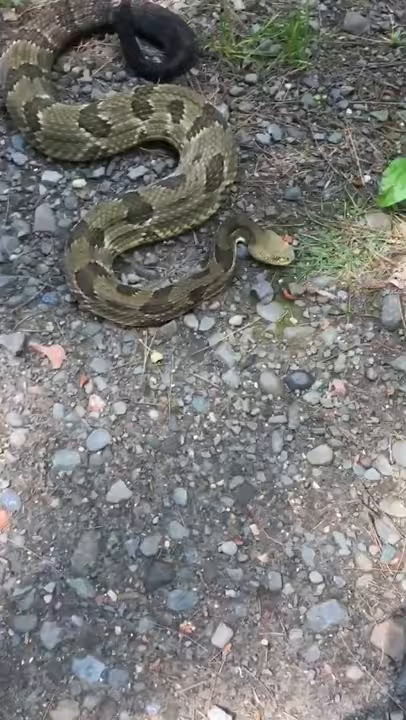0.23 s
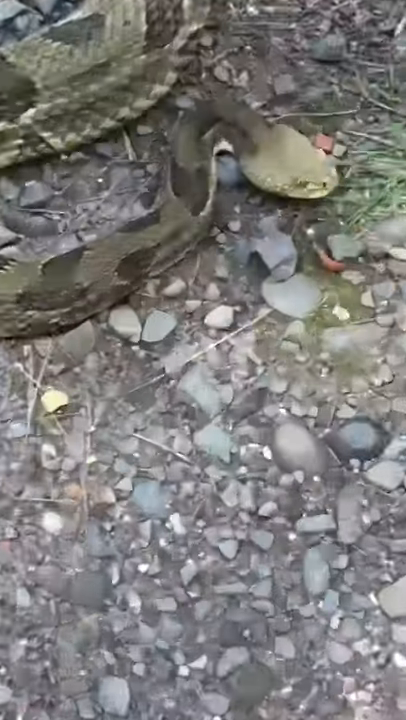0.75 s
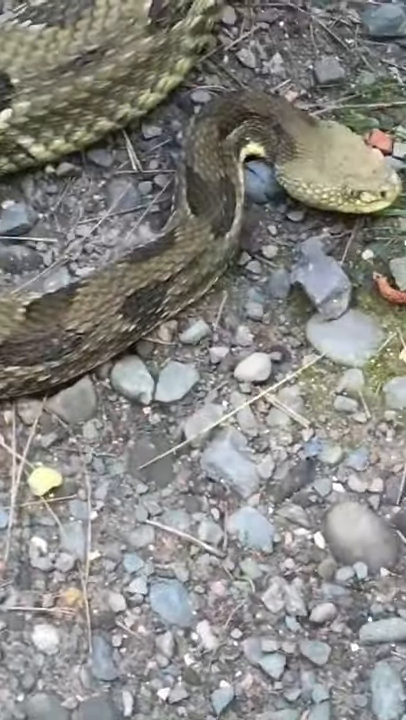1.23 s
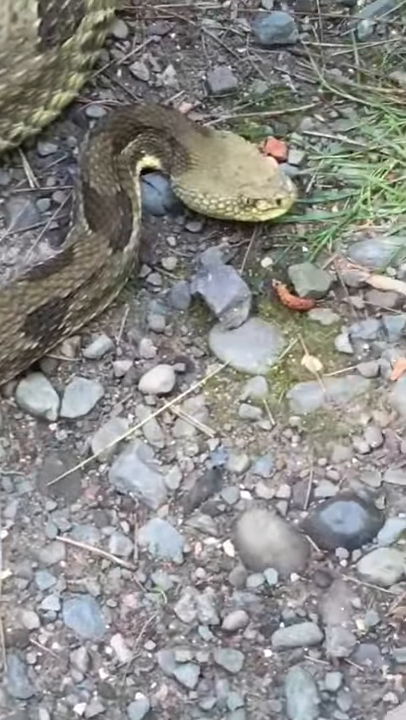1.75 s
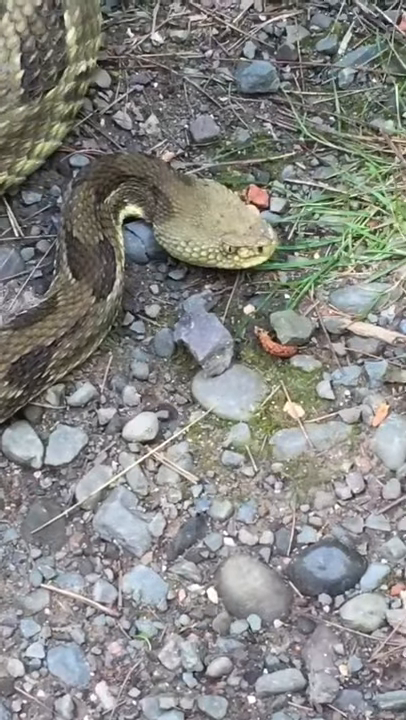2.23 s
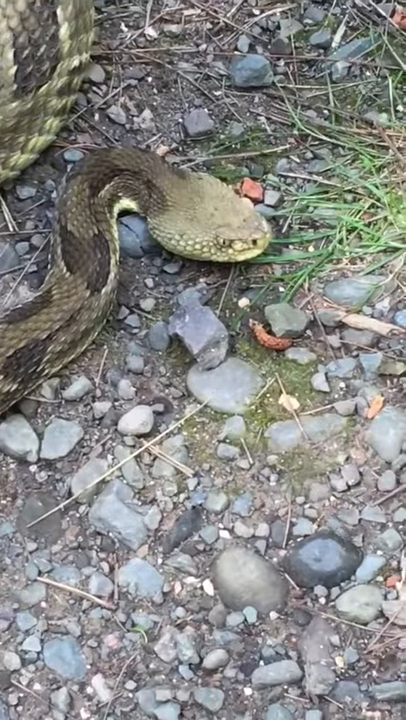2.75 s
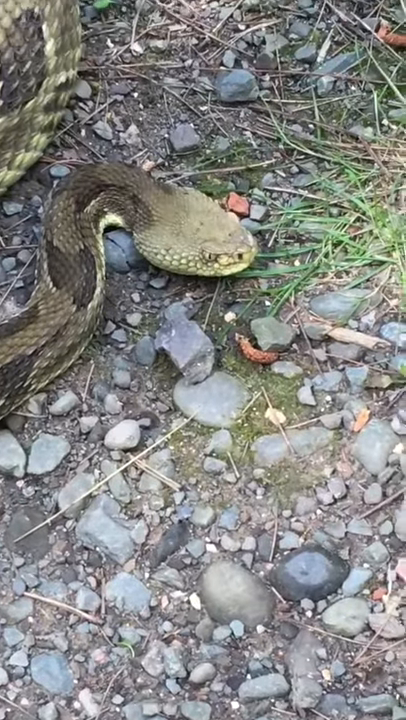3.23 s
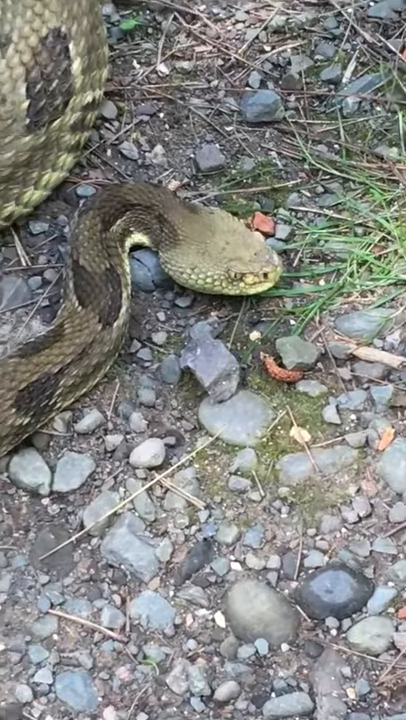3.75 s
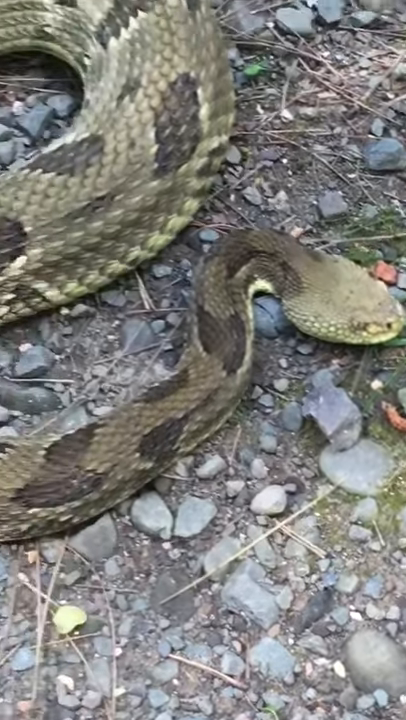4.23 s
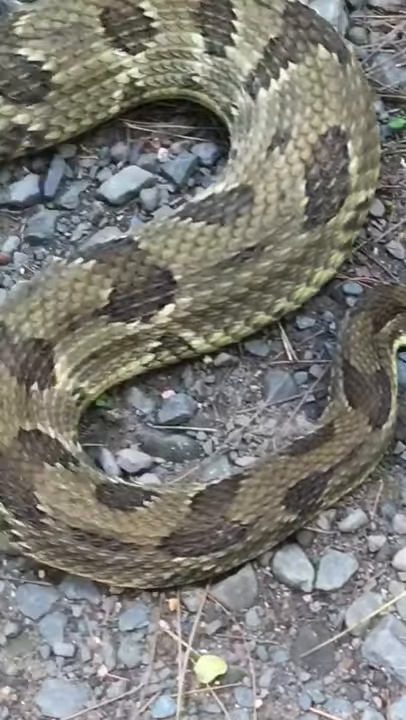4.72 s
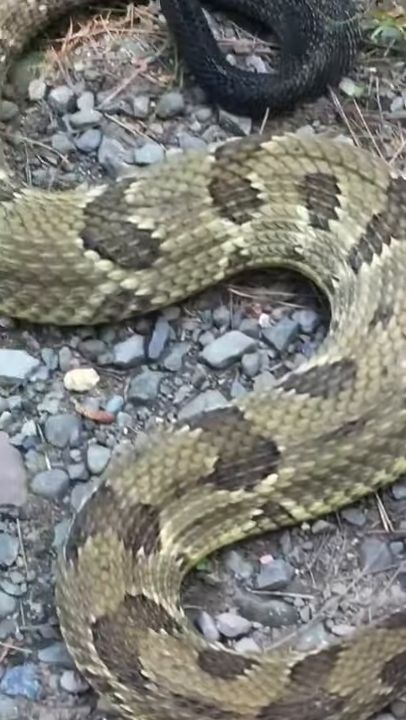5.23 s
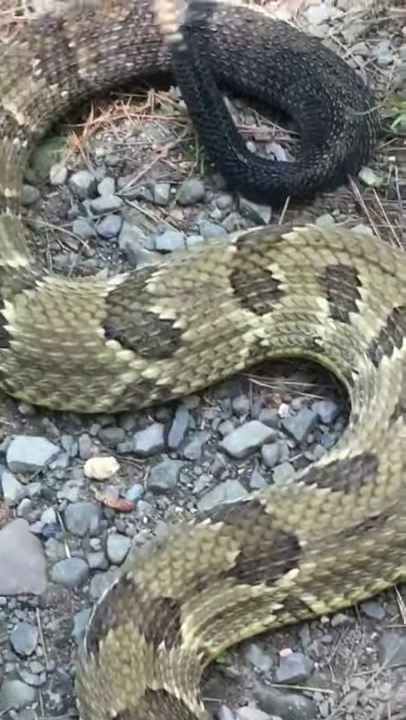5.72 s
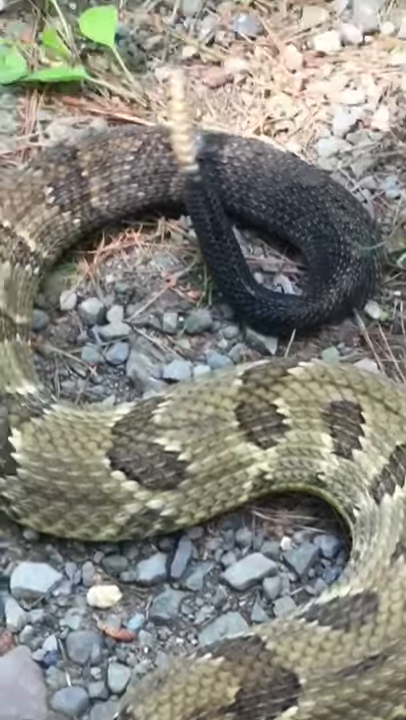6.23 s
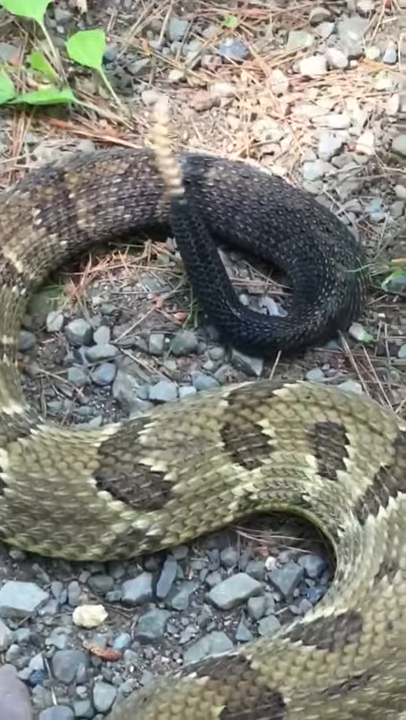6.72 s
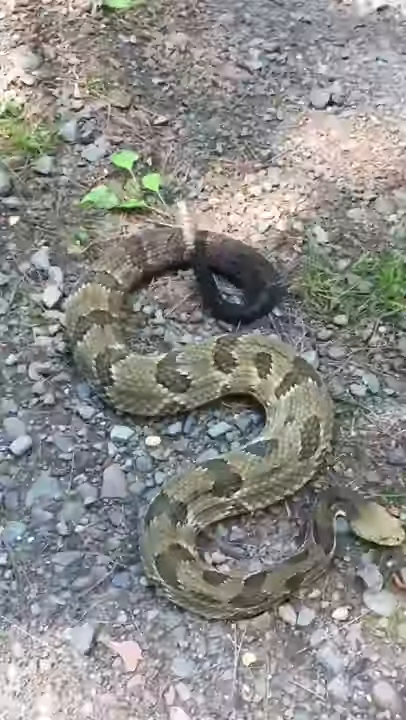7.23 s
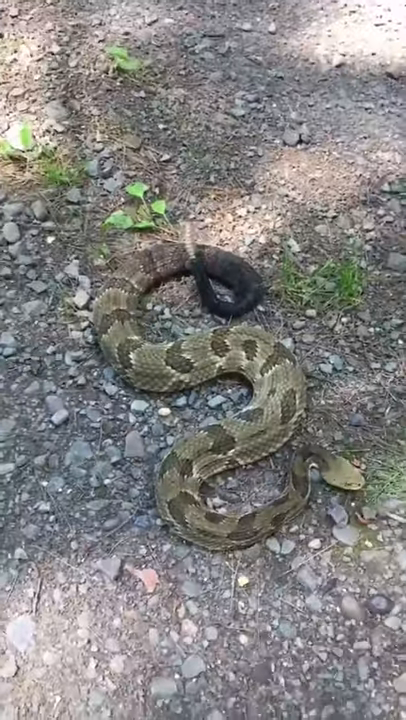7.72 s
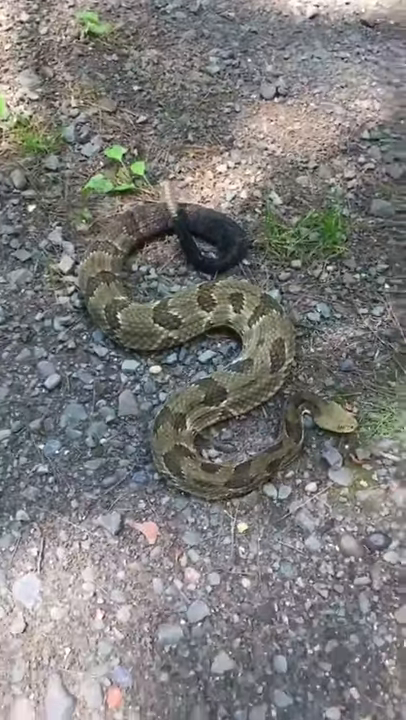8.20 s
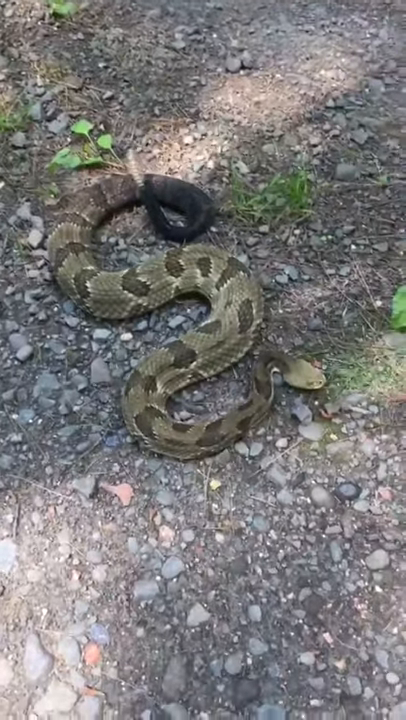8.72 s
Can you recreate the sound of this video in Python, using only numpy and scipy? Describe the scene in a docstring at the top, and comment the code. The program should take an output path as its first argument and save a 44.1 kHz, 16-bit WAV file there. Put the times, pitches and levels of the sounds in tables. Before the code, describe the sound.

Close, steady sizzling buzz of a rattlesnake's rattle, turning slightly harder halfway through, over a faint low engine hum.

```python
"""Rattlesnake on a gravel path

A coiled rattlesnake buzzes without pause, about a metre from a hand-held microphone. Its tail swings
some 65 times a second; on each half swing the loose horny segments clash in a burst of tiny clicks.
Halfway through, after a faint tap, the microphone moves from head to tail and the buzz turns harder;
near the end it moves most of the way back. Some way off an engine idles in the outdoor hush."""
import sys
import numpy as np
from scipy import signal
from scipy.fft import rfft, irfft
from scipy.io import wavfile

SR = 44100
rng = np.random.default_rng(int(sys.argv[2]) if len(sys.argv) > 2 else 0)


def generate_wav(sig):
    """Save sig (samples, or channels by samples) to the path in sys.argv[1] as 16-bit PCM at SR."""
    pcm = np.round(np.clip(np.atleast_2d(sig).T, -1, 1) * 32767).astype(np.int16)
    wavfile.write(sys.argv[1], SR, pcm)


N = 395136

# colour of one clash a metre off, microphone over the head and over the tail: pitch_hz, relative_db
CLASH_AT_HEAD = [(1200, -31.5), (2400, -25.5), (3200, -25.5), (3950, -6), (4270, -12.5), (4750, -3.5),
                 (5350, -10.5), (6050, -0.6), (8200, -3.5), (9600, -7), (10450, -13.5), (12100, -12.5),
                 (13500, -6), (14400, -8.5), (15700, -9.5)]
CLASH_AT_TAIL = [(1200, -29.5), (3250, -25.5), (3970, -2.5), (4280, -11), (4730, -2.5), (5790, -8.5),
                 (6480, 3), (7250, -2.5), (9600, -6), (10450, -13.5), (12200, -9.5), (13300, -4.5),
                 (14400, -6.5), (15700, -9)]
def rattle(aim, head_db=-25.8, tail_db=-24.8):
    """Clicks ring briefly in the hollow segments; their colour follows the microphone's aim."""
    clicks = clashes()
    knocks = segments(clicks)
    over_head = from_db(head_db) * coloured(knocks, CLASH_AT_HEAD)
    over_tail = from_db(tail_db) * coloured(knocks, CLASH_AT_TAIL)
    return (1 - aim) * over_head + aim * over_tail + cavity(clicks)


# pace of the shaking tail, two strokes to a swing: time_s, strokes_per_s
TAIL_PACE = [(0.0, 129.5), (1.19, 128.4), (3.38, 129.8), (3.58, 131.5), (4.18, 128.1), (5.38, 132.3),
             (5.77, 131.0), (5.97, 132.1), (6.97, 128.6), (8.16, 130.4), (8.56, 129.7), (8.96, 132.7)]
def clashes(clicks_per_s=13000, lull=.31, bunching=1.6, snaps_per_s=40, snap_db=11.0):
    """Segments click together: thick and hard in mid stroke, sparse and soft between strokes."""
    pace = in_time(TAIL_PACE) * (1 + .002 * drift(1.5))
    strokes = np.cumsum(pace) / SR + .04 * drift(12) + 1
    swing = lull + np.abs(np.sin(np.pi * strokes)) ** bunching
    # no two strokes are alike
    stroke_db = .5 * rng.standard_normal(N)[np.maximum(strokes, 0).astype(int)]
    # the segments are linked, so the contacts follow each other at a loosely even pace
    contact_rate = clicks_per_s * np.sqrt(swing / np.mean(swing))
    contacts = np.cumsum(contact_rate * rng.exponential(1, N)) / SR
    touch = np.diff(np.floor(contacts), prepend=0) > 0
    click_db = 2.5 * np.minimum(rng.standard_normal(N), 3)
    # now and then a segment snaps hard against its neighbour
    snaps = rng.random(N) < snaps_per_s / clicks_per_s
    click_db = np.where(snaps, snap_db, click_db)
    return touch * swing ** (1 / 3) * from_db(stroke_db + click_db)


# what the contacts favour, from the wide base segments to the fine edges: pitch_hz
CONTACT_HZ = np.geomspace(4000, 14000, 6)
def segments(clicks, reach_octaves=.45, sizzle_db=-1.5):
    """Each click falls on one contact and is strongest near its pitch; together they fill the band."""
    hz = np.geomspace(500, 20000, 60)
    octaves_off = np.log2(hz / CONTACT_HZ[:, None])
    power = np.exp(-(octaves_off / reach_octaves) ** 2) + 1e-4
    shares = power / power.sum(axis=0)
    struck = rng.integers(0, len(shares), N)
    signed_clicks = clicks * rng.choice([-1, 1], N)
    knocks = []
    for contact, share in enumerate(shares):
        spectrum = np.c_[hz, 10 * np.log10(share)]
        ring = coloured(signed_clicks * (struck == contact), spectrum, size=512)
        knocks.append(np.sqrt(share @ hz) * ring)
    return sum(knocks[:-1]) + from_db(sizzle_db) * knocks[-1]


def cavity(clicks, pitch_hz=5386, width_hz=770, rest_db=-34.3):
    """The clicks ring the rattle's main cavity, which surges on every sway."""
    ring = clicks * rng.choice([-1, 1], N)
    for _ in range(2):
        ring = resonance(ring, pitch_hz, width_hz)
    return from_db(rest_db + sway()) * rms_one(ring)


def sway(sways_per_s=2.65, crest_s=.24, surge_db=5.8, settle_s=2.6, flutter_db=1.3):
    """The rattle sways to and fro: surges, in dB, that die down into an uneven flutter."""
    t = np.arange(N) / SR
    facing = .5 + .5 * np.cos(2 * np.pi * sways_per_s * (t - crest_s))
    return surge_db * np.exp(-t / settle_s) * facing + flutter_db * drift(4)


def with_ground(direct, delay_s=.0023, wander_s=.0003, echo_db=-16.5):
    """The stony ground returns a weak echo; its delay wanders with the hand holding the microphone."""
    now = np.arange(N)
    lag = (delay_s + wander_s * drift(.496)) * SR
    return direct + from_db(echo_db) * np.interp(now - lag, now, direct)


def tap(start_s=4.292, peak_db=-31, pitch_hz=820, width_hz=360):
    """One faint, dull tap close to the microphone."""
    impulse = 1. * (np.arange(N) == round(start_s * SR))
    ring = resonance(impulse, pitch_hz, width_hz)
    return from_db(peak_db) * ring / np.abs(ring).max()


# an engine idling some way off, as it reaches the path: firing_multiple, level_db (rms)
ENGINE_TONES = [(1.02, -57.5), (2.04, -48), (7, -63), (10, -63), (15, -63.5), (17, -71), (18, -66.3),
                (19, -71.5), (24, -69.5)]
def engine(firing_hz=40.42, speed_wander=.004, flutter=.4):
    """Far engine tones: the speed hunts slightly and each tone flutters on its way."""
    firings = np.cumsum(firing_hz * (1 + speed_wander * drift(1.53))) / SR
    tones = np.zeros(N)
    for multiple, level_db in ENGINE_TONES:
        gain = np.sqrt(2) * from_db(level_db) * (1 + flutter * drift(3.1))
        tones += gain * np.sin(2 * np.pi * (multiple * firings + rng.random()))
    return tones


# outdoor air and engine rumble at both microphone positions: pitch_hz, head_relative_db, tail_relative_db
HUSH_COLOUR = np.array([(25, -31, -31), (45, -11.0, -10.5), (70, -10.5, -9.5), (95, -2.0, -1.5),
               (172, -6.5, -5.8), (218, -12.0, -11.5), (293, -10, -10.8), (444, -18.5, -20.5),
               (800, -23.0, -25.0), (1100, -23.5, -22.0), (1370, -24.0, -20.5), (1460, -17.5, -16.5),
               (2850, -23.5, -25.5), (3200, -22.5, -22), (4500, -50, -48)])
def hush(aim, head_db=-42.6, tail_db=-43.8):
    """Smooth low rumble and air, coloured by where the microphone is held."""
    air = rng.standard_normal(N)
    over_head = from_db(head_db) * coloured(air, HUSH_COLOUR[:, [0, 1]])
    over_tail = from_db(tail_db) * coloured(air, HUSH_COLOUR[:, [0, 2]])
    return (1 - aim) * over_head + aim * over_tail


def coloured(x, spectrum, size=8192):
    """Pass x through a minimum-phase body given as (pitch_hz, relative_db) rows; rms 1."""
    hz, db = np.transpose(spectrum)
    grid_hz = np.maximum(np.arange(size // 2 + 1) * SR / size, 1)
    gain = from_db(np.interp(np.log(grid_hz), np.log(hz), db))
    cepstrum = irfft(np.log(gain))
    # folded so that the body rings only after it is struck
    cepstrum[1:size // 2] *= 2
    cepstrum[size // 2 + 1:] = 0
    response = irfft(np.exp(rfft(cepstrum)))
    return rms_one(signal.fftconvolve(x, response)[:N])


def resonance(x, hz, width_hz):
    """One damped resonance with gain 1 at its peak."""
    r = np.exp(-np.pi * width_hz / SR)
    feedback = [1, -2 * r * np.cos(2 * np.pi * hz / SR), r * r]
    return signal.lfilter(np.array([1, 0, -1]) * (1 - r * r) / 2, feedback, x)


def drift(rate):
    """Slow chance with a spread of 1, changing about `rate` times a second."""
    hop, warm_up = 40, 2000
    r = np.exp(-2 * np.pi * hop * rate / SR)
    noise = rng.standard_normal(N // hop + warm_up + 2)
    slow = signal.lfilter([1], [1, -2 * r, r * r], noise)[warm_up:]
    return np.interp(np.arange(N) / hop, np.arange(len(slow)), rms_one(slow))


def in_time(rows):
    """A curve of (time_s, value) rows, read at every sample."""
    return np.interp(np.arange(N) / SR, *np.transpose(rows))


def from_db(db):
    """Decibels to gain."""
    return 10 ** (np.asarray(db) / 20)


def rms_one(x):
    """Scale to an rms of 1."""
    return x / np.sqrt(np.mean(x ** 2) + 1e-20)


# path of the hand-held microphone: time_s, aim (0 over the head, 1 over the tail)
MICROPHONE_PATH = [(0, 0), (4.4, 0), (4.82, 0.15), (5.0, 0.8), (5.7, 1), (8.15, 0.97), (8.5, .5),
                   (8.96, 0.25)]
def scene():
    """One microphone over the gravel: the snake a metre away, engine and hush behind."""
    aim = in_time(MICROPHONE_PATH)
    snake = with_ground(rattle(aim))
    return (snake + engine() + hush(aim) + tap())[None]


def record(dry, cutoff_hz=15720):
    """The highest treble is cut steeply."""
    return signal.sosfilt(signal.ellip(12, .1, 85, cutoff_hz, fs=SR, output="sos"), dry)


dry = scene()
out = record(dry)
generate_wav(out)
```